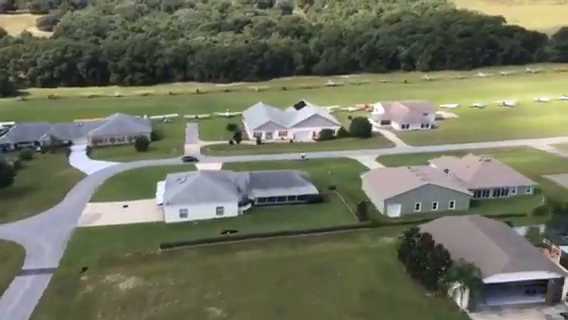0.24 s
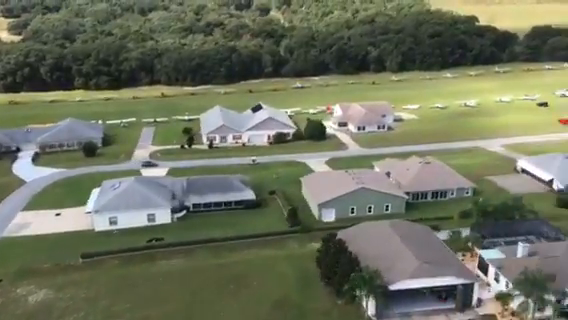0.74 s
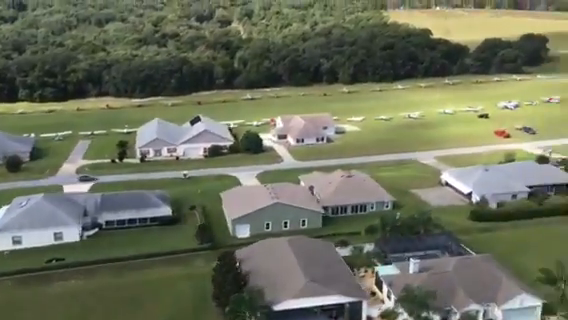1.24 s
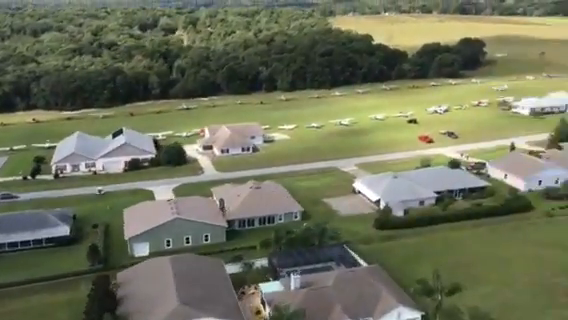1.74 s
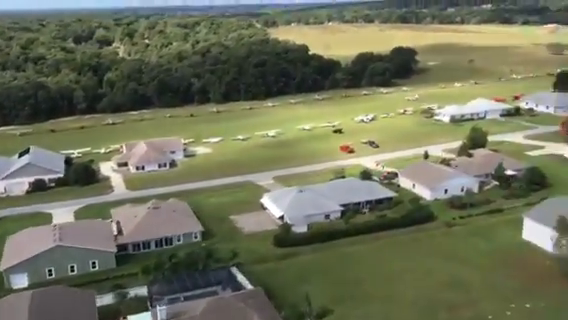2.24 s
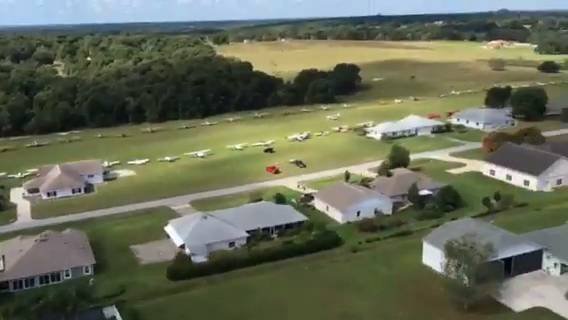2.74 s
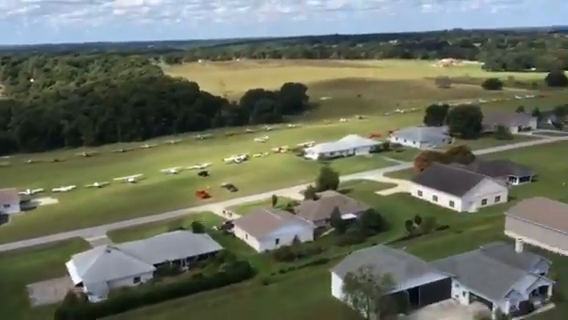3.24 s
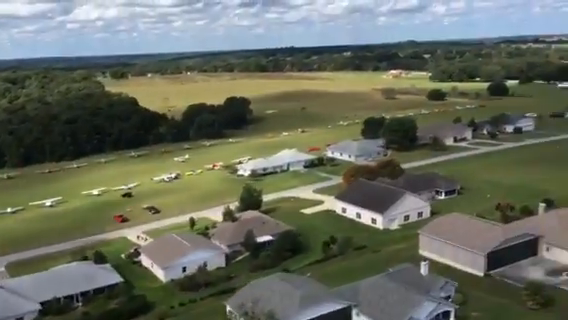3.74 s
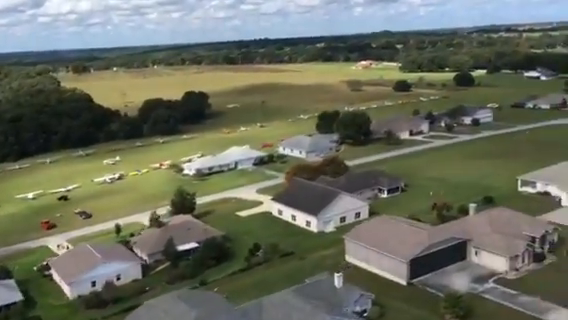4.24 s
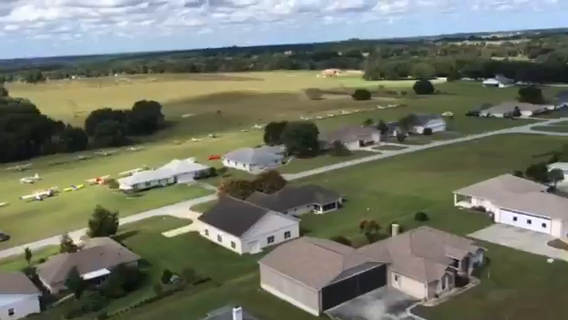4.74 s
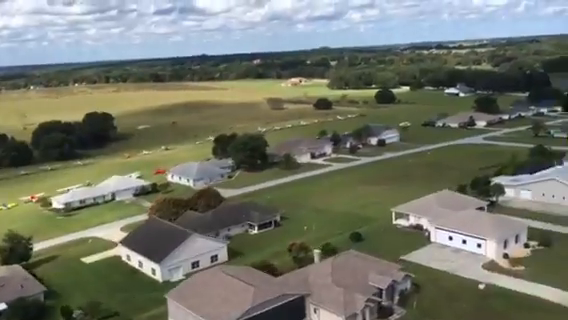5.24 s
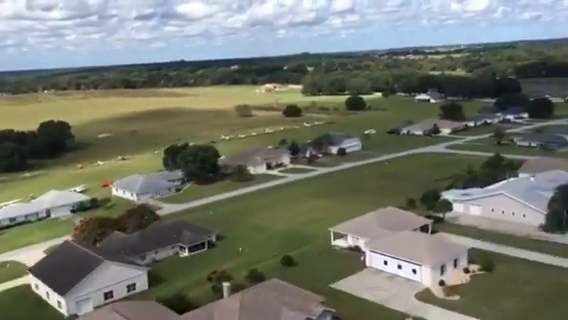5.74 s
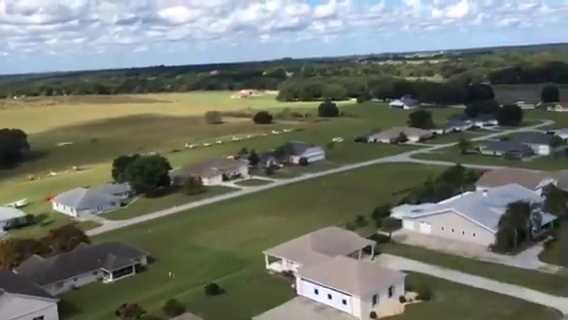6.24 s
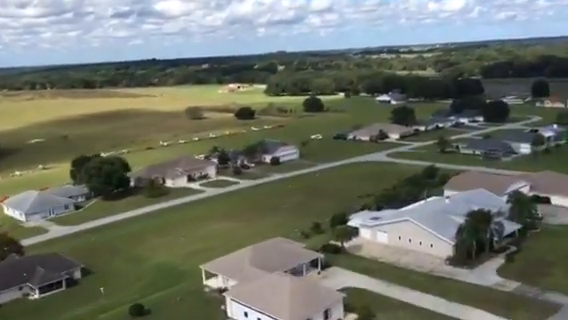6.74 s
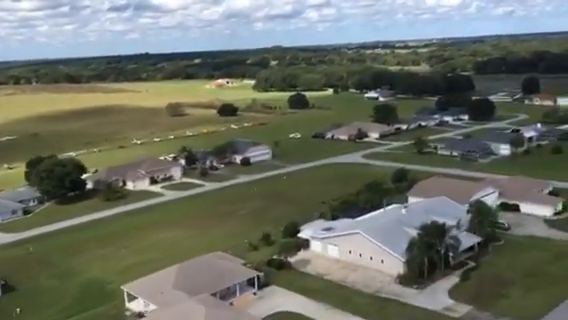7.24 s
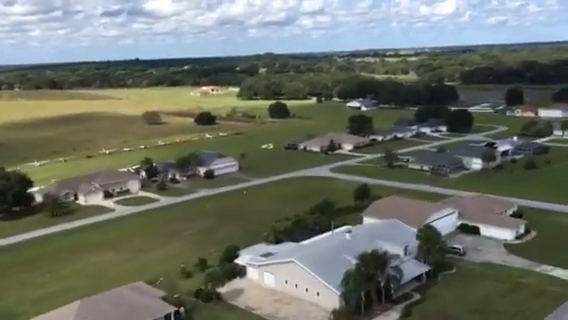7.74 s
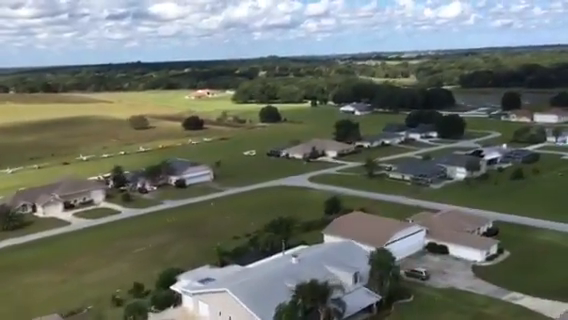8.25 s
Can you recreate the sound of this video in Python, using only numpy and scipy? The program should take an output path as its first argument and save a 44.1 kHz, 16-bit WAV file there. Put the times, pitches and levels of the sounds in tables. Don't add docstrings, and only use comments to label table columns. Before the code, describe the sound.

Wind rumbles, flutters and pops on a phone microphone, calm then violent, over a steady low helicopter engine drone and pulsing blade hiss.

```python
import sys
import numpy as np
from scipy import signal
from scipy.fft import rfft, irfft
from scipy.io import wavfile
from scipy.ndimage import uniform_filter1d

SR = 44100
rng = np.random.default_rng(int(sys.argv[2]) if len(sys.argv) > 2 else 0)


def boost_factor(decibels):
    exponent = np.asarray(decibels, float) / 20
    return 10 ** exponent


def waveform_to_disk(signal):
    frames = np.transpose(np.atleast_2d(signal))
    scaled = np.clip(frames, -1, 1) * 32767
    samples = np.round(scaled).astype(np.int16)
    wavfile.write(sys.argv[1], SR, samples)


N = 374850


def colour(x, shape):
    hz, db = np.transpose(shape)
    bins = np.log(np.fft.rfftfreq(x.shape[-1], 1 / SR) + 1)
    gain = boost_factor(np.interp(bins, np.log(hz), db, left=-90, right=-90))
    y = irfft(rfft(x) * gain, x.shape[-1])
    return y / np.sqrt(np.mean(y ** 2, axis=-1, keepdims=True))


def noise(shape):
    return colour(rng.standard_normal(N), shape)


def smooth_twice(x, size):
    return uniform_filter1d(uniform_filter1d(x, size), size)


def walk(rate_hz):
    hold = int(SR / rate_hz)
    steps = np.repeat(rng.standard_normal(N // hold + 1), hold)
    wander = smooth_twice(steps, hold)[:N]
    return wander / wander.std()


def curves(table):
    s, *columns = np.transpose(table)
    return [np.interp(np.arange(N) / SR, s, column) for column in columns]


ENGINE_ORDERS = {3: -30, 4: -32, 10: -48, 12: -39, 14: -46, 18: -41.5, 28: -56, 38: -56, 39: -52, 42: -57}
# freq_hz, level_db
CABIN_ROAR = [(180, -16), (260, -2.5), (400, -6), (470, -29.5), (800, -26.5), (880, -13.5), (1100, -25),
              (1950, -20.5), (3700, -27), (4400, -27), (9200, -34.5), (13000, -35), (15800, -43.5)]


def engine():
    cycle_hz = 22.7 * (1 + 0.002 * walk(4))
    cycle = 2 * np.pi * np.cumsum(cycle_hz) / SR
    drone = 0
    for order, db in ENGINE_ORDERS.items():
        level = boost_factor(db + 3.5 + 1.51 * walk(6))
        drone = drone + level * np.sin(order * cycle + 2 * np.pi * rng.random())
    return drone + boost_factor(-37.5 + 1.96 * walk(19)) * noise(CABIN_ROAR)


# freq_hz, width_hz, level_db, lag_periods, decay_periods
BLADE_SWISH = [
    (1890, 1890, 7.5, -0.052, 0.53),
    (4464, 1620, 3.5, 0.018, 0.18),
    (6540, 3100, -5, 0.023, 0.63),
    (8990, 2910, 1.5, -0.031, 0.25),
    (11380, 2300, 3, -0.0414, 0.069),
    (14200, 3500, -7.5, .05, .3),
]


def rotor():
    blade_hz, start, rise = 13.612, -0.165, 0.2
    turn = blade_hz * np.arange(N) / SR + start + 0.0115 * walk(4.55)
    out = 0
    for hz, width, db, lag, decay in BLADE_SWISH:
        passes, phase = np.divmod(turn - lag + rise + 1, 1)
        strength = boost_factor(1.4 * rng.standard_normal(N // 2000))[passes.astype(int)]
        attack = np.minimum(phase / rise, 1)
        fade = np.exp(-np.maximum(phase - rise, 0) / decay)
        band = noise([(hz - width, -16), (hz - width / 3, -3), (hz, 0),
                      (hz + width / 3, -3), (hz + width, -16)])
        out = out + boost_factor(db) * strength * attack * fade * band
    return out


# time_s, swish_db
MACHINE_LEVEL = [
    (0.0, -53.5),
    (0.12, -56),
    (1.0, -54),
    (1.9, -51.5),
    (3.3, -54),
    (5.0, -57),
    (8.48, -58),
    (8.5, -50.5),
]


def machine():
    swish_db, = curves(MACHINE_LEVEL)
    return boost_factor(swish_db + 53.5) * (engine() + boost_factor(-46) * rotor())


# time_s, rumble_lift_db
SURGES = [(0.05, 6), (0.27, 4.5), (0.39, 2.5), (0.62, 2), (0.9, 1.5), (1.32, 6), (1.57, 3), (1.84, 6.5),
          (2.03, 4.5), (2.16, 5), (2.38, 6.5), (2.7, 4.5), (3.0, 4.5), (3.19, 5.5), (3.7, 4.5), (3.86, 2.5),
          (4.11, 0.5), (4.32, 1), (4.87, 4.5), (5.07, -1), (5.26, 5), (6.0, 5), (6.35, 5), (6.57, 1),
          (6.71, 4), (7.24, 5), (7.42, 4), (7.72, 5.5), (8.0, 4), (8.35, 5)]


def surges(force_db):
    t = np.arange(N) / SR
    surge_s = 0.05
    heave_db = sum(db * np.exp(-((t - s) / surge_s) ** 2) for s, db in SURGES)
    airspeed_db = 0.4 * t
    lull_db = -20 + airspeed_db + 0.4 * (force_db + 32.5) + 1.2 * walk(14)
    return lull_db + heave_db


# freq_hz, level_db
HEAVE = [(32, -14), (44, -3), (68, -4), (95, -12.5), (140, -21.5)]
RUMBLE = [(45, -11), (68, -1.5), (90, 2), (120, -0.5), (160, -12), (220, -23)]
THUD = [(90, -24), (140, 2), (250, -3.5), (400, -19.5), (700, -31.5)]
FLUTTER = [(250, 2), (450, -3), (1000, -0.5), (2000, -15.5), (4000, -34), (8000, -48.5), (14000, -49)]
CRACKLE = [(700, -34), (1500, -6), (3000, -7.5), (6000, -14), (12000, -40.5)]


def buffet(rumble_db, thud_db, flutter_db):
    roll_db = 0.703 * (thud_db + 30) - 19.5
    deep = boost_factor(-18) * noise(HEAVE) + boost_factor(roll_db) * noise(RUMBLE)
    swell = np.sqrt(smooth_twice(deep ** 2, int(0.045 * SR)))
    rumble = deep * (boost_factor(rumble_db) / swell) ** 1.173

    flurry = 0.558 * walk(120) + 1.26 * walk(500)
    flurry = 2 * np.tanh(flurry / 2)
    thud = boost_factor(2.7 * walk(40) + thud_db) * noise(THUD)
    gust_db = flutter_db + 0.65 * np.minimum(flutter_db + 31.5, 0)
    flutter = boost_factor(4.42 * flurry + gust_db - 2.5) * noise(FLUTTER)
    crackle = boost_factor(12.1 * flurry + 1.353 * gust_db - 14) * noise(CRACKLE)
    return rumble + thud + flutter + crackle


# time_s, snap_db, edge_db
CALM_PUFFS = [(0.09, -15.5, -29), (0.1, -13.5, -55), (0.253, -19.5, -58.5), (0.545, -21, -56),
              (0.618, -20.5, -52), (0.656, -18, -44.5), (0.665, -13, -29), (0.773, -19, -60),
              (0.79, -17.5, -39.5), (0.853, -19.5, -61.5), (0.916, -15, -60.5), (0.987, -20.5, -58),
              (1.062, -24, -59), (1.131, -20.5, -59.5), (1.56, -19.5, -47), (1.578, -18.5, -56),
              (1.785, -17.5, -39.5), (1.843, -15, -35), (1.852, -11, -28), (2.087, -22, -56),
              (2.186, -20.5, -50), (2.588, -12.5, -31.5), (2.887, -22.5, -55), (3.482, -26.5, -50.5),
              (3.622, -21, -47.5), (3.747, -19.5, -35.5), (3.77, -14.5, -22), (3.868, -17.5, -29.5),
              (3.916, -13, -38), (3.962, -15, -58)]
# time_s, snap_db, edge_db
RISING_PUFFS = [(4.052, -15, -25), (4.069, -20.5, -31.5), (4.101, -18, -43.5), (4.198, -17.5, -35.5),
                (4.224, -17, -29.5), (4.263, -21, -35.5), (4.323, -10.5, -23), (4.339, -16.5, -25.5),
                (4.357, -13, -16.5), (4.43, -14.5, -31), (4.542, -13, -22), (4.598, -17, -51),
                (4.629, -17.5, -51.5), (4.703, -9.5, -20), (4.755, -18.5, -46), (4.8, -15, -37.5),
                (4.827, -16.5, -26.5), (4.854, -7, -27), (4.877, -14.5, -25), (4.912, -18, -29),
                (4.982, -13, -25), (5.007, -14, -35), (5.045, -13, -27), (5.079, -11.5, -28),
                (5.158, -15, -47.5), (5.191, -16, -25.5), (5.227, -10, -23.5), (5.246, -16, -16.5),
                (5.29, -26, -19.5)]
# time_s, snap_db, edge_db
GUST_PUFFS = [(5.421, -8, -15.5), (5.602, -5.5, -18.5), (5.747, -14, -16), (5.854, -8, -17),
              (5.899, -6.5, -22.5), (6.259, -11.5, -23.5), (6.331, -10.5, -33.5), (6.409, -9.5, -49),
              (6.589, -14, -31.5), (6.671, -8.5, -27.5), (6.766, -19, -27.5), (6.885, -13.5, -25),
              (6.915, -16, -22.5), (7.001, -11, -30), (7.028, -14, -45), (7.218, -9.5, -20),
              (7.39, -13.5, -27), (7.43, -13, -20.5), (7.633, -11, -23.5), (7.706, -10.5, -36.5),
              (7.721, -12, -25.5), (7.867, -13, -29.5), (7.928, -11, -29), (8.008, -13.5, -43),
              (8.055, -12.5, -26.5), (8.092, -14, -26.5), (8.206, -15, -25.5), (8.353, -10, -27.5),
              (8.415, -8, -24.5), (8.462, -13.5, -30.5)]


def swarm(force_db, gusty_db):
    hard = np.vstack([CALM_PUFFS, RISING_PUFFS, GUST_PUFFS])
    gap_s, clear_s = 0.014, 0.009
    slots = np.arange(0, N / SR - gap_s, gap_s)
    timing, strength, brightness = rng.random((len(slots), 3)).T
    s = slots + gap_s * timing
    at = (s * SR).astype(int)

    snap_db = -10.5 + 6.5 * np.log(strength + 1e-9)
    snap_db += 1.772 * np.minimum(force_db[at] + 17.5, 0)
    snap_db += 1.5 * walk(35)[at]
    edge_db = snap_db - 21.5 + 0.746 * (gusty_db[at] + 32) + 3 * np.log(1 / brightness - 1)
    edge_db = np.minimum(edge_db, snap_db - 8)

    clear = np.abs(s[:, None] - hard[:, 0]).min(axis=1) > clear_s
    lesser = np.transpose([s, snap_db, edge_db])[clear]
    return np.vstack([hard, lesser])


# freq_hz, level_db
PUFF_BODY = [(170, -41.5), (300, 5), (520, 0), (850, -14)]
PUFF_SNAP = [(400, -4), (750, 2), (1500, -1), (3000, -16.5), (5500, -37)]
PUFF_EDGE = [(1800, 1), (3200, 1.5), (6000, -7.5), (10000, -17), (16000, -25.5)]
PUFF_WAKE = [(250, 4.5), (500, 2), (1200, -2), (2500, -13), (5000, -34.5)]


def puffs(bursts):
    rise_s, fall_s, body_s, wake_s, spray_s = 0.000825, 0.000975, 0.00505, 0.01002, 0.008
    s, snap_db, edge_db = bursts.T
    size, lead = 2048, 1024
    t = (np.arange(size) - lead) / SR
    chance = rng.standard_normal((len(s), 2 * size + 2))
    air, eddies = chance[:, :size], chance[:, size:2 * size]
    air[:, lead] = 4.47 * np.sign(air[:, lead])

    stretch = np.exp(0.247 * chance[:, -1:])
    short = np.exp(-np.abs(t) / (np.where(t < 0, rise_s, fall_s) * stretch))
    long = np.exp(-(t / (body_s * stretch)) ** 2)
    ragged = np.exp(8 * uniform_filter1d(eddies, 90, axis=1) - (t / wake_s) ** 2)
    spray = ragged * np.exp(-(t / spray_s) ** 2)
    body_db = 0.701 * snap_db + 3.7 * chance[:, -2]

    grains = boost_factor(snap_db - 17.5)[:, None] * colour(short * air, PUFF_SNAP)
    grains += boost_factor(edge_db - 13.5)[:, None] * colour(short ** 1.31 * air, PUFF_EDGE)
    grains += boost_factor(body_db - 20)[:, None] * colour(long * air, PUFF_BODY)
    grains += boost_factor(1.339 * snap_db - 11)[:, None] * colour(ragged * air[:, ::-1], PUFF_WAKE)
    grains += boost_factor(edge_db - 25)[:, None] * colour(spray * eddies, PUFF_EDGE)

    out = np.zeros(N + size)
    np.add.at(out, (s * SR).astype(int)[:, None] + np.arange(size), grains)
    return out[lead:lead + N]


# time_s, force_db, gustiness_db
WIND = [(0, -30.5, -35.5), (0.75, -29, -34.5), (1.2, -32, -34), (3.65, -29.5, -36.5), (4.18, -21.5, -43.5),
        (5.13, -22.5, -45.5), (5.22, -16.5, -22.5), (5.88, -12, -20), (6.38, -18.5, -32),
        (6.5, -20.5, -36.5), (6.66, -17.5, -41), (7.05, -17, -32.5), (7.31, -16.5, -28.5),
        (7.7, -20.5, -44), (7.8, -24, -38), (8.05, -19.5, -35), (8.29, -21, -41), (8.49, -21, -49.5)]


def scene():
    background = machine()
    force_db, gusty_db = curves(WIND)
    buffeting = buffet(surges(force_db), force_db, gusty_db)
    bursts = puffs(swarm(force_db, gusty_db))
    return (buffeting + bursts + background)[None]


def roll_off(x):
    return signal.sosfilt(signal.butter(12, 16470, fs=SR, output="sos"), x)


def record(dry):
    hz = np.fft.rfftfreq(N, 1 / SR)
    port_dip = boost_factor(-2.5 * np.exp(-((hz - 10380) / 215) ** 2))
    bass_cut = 1 / np.sqrt(1 + (42 / (hz + 1)) ** 8)
    heard = irfft(rfft(dry) * port_dip * bass_cut, N)
    ceiling, knee = 0.71, 5.0
    limited = heard / (1 + np.abs(heard / ceiling) ** knee) ** (1 / knee)
    top_cut = np.where(hz > 15750, boost_factor(-40), 1)
    return roll_off(irfft(rfft(limited) * top_cut, N))


dry = scene()
out = record(dry)
waveform_to_disk(out)
```